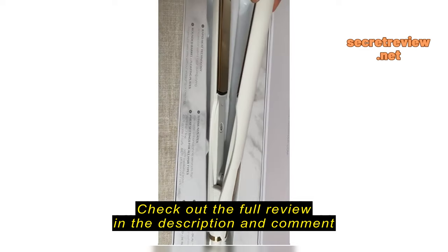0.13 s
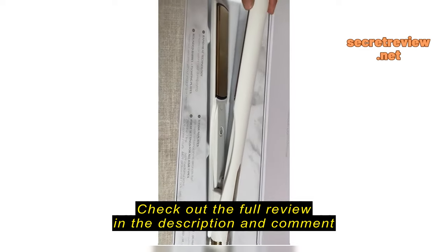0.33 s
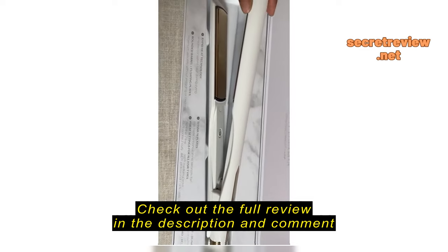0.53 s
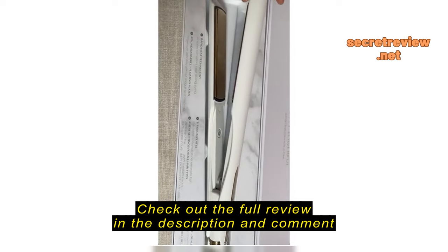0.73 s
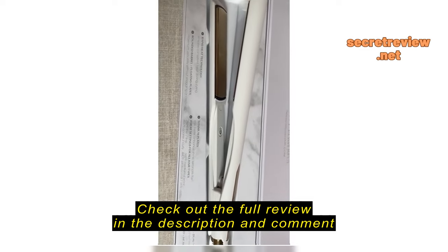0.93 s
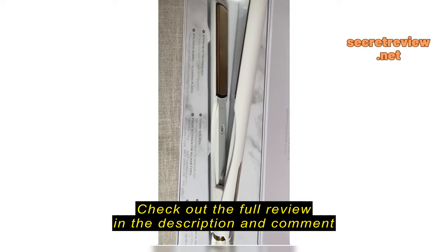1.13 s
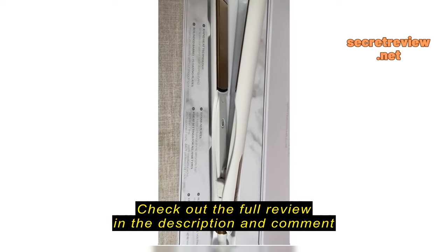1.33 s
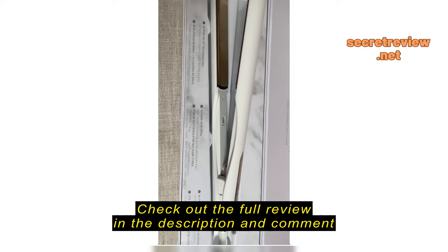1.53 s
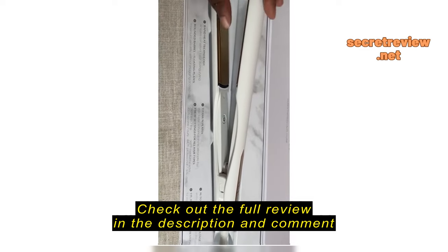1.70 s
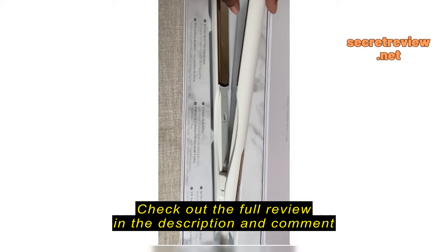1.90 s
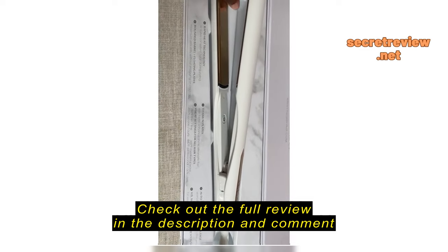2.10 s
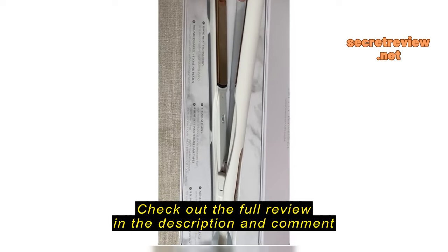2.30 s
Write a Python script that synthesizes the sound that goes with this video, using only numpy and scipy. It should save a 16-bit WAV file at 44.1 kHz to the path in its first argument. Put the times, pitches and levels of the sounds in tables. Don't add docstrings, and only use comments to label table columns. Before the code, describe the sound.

Close phone pickup in a small quiet room: a hair straightener knocks on a hollow cardboard box. A low settling thud and drone open at 0 s; loud clustered knocks, plastic clacks and sharp cracks follow at 0.24-0.32 and 0.39-0.55 s, with finger rubs and low box sliding. Faint ventilation hum remains, then light taps at 1.08 and 1.25 s and a clearer clack at 1.41 s, then quiet.

```python
import sys
import numpy as np
from scipy import signal
from scipy.fft import rfft, irfft
from scipy.io import wavfile
from scipy.ndimage import map_coordinates

SR = 44100
rng = np.random.default_rng(int(sys.argv[2]) if len(sys.argv) > 2 else 0)


def volts_from_decibels(level):
    exponent = np.asarray(level, float) / 20
    return 10 ** exponent


def transcribe(signal):
    frames = np.atleast_2d(signal).T
    limited = np.clip(frames, -1, 1)
    pcm = np.round(limited * 32767).astype(np.int16)
    wavfile.write(sys.argv[1], SR, pcm)


N = 103635
LONG = 2 ** 15
HZ = np.fft.rfftfreq(LONG, 1 / SR)
FULL_HZ = np.fft.rfftfreq(N, 1 / SR)
T_S = np.arange(N) / SR
AIR_TOP_HZ = 12900
MID_TO_SIDES = np.array([[1], [-1]])


def unit(x):
    return x / np.sqrt(np.mean(x ** 2) + 1e-20)


def along(points, hz):
    f, v = np.transpose(points)
    return np.interp(np.log(hz + 1), np.log(f + 1), v)


def noise(gain):
    return unit(irfft(rfft(rng.standard_normal(N)) * gain, N))


def wobble(rate_hz):
    knots = rng.standard_normal(int(N * rate_hz / SR) + 4)
    return map_coordinates(knots, [np.arange(N) * rate_hz / SR])


def octave_band(centre_hz, octaves):
    return np.exp(-(np.log2((FULL_HZ + 1) / centre_hz) / octaves) ** 2)


def stroke(start_s, length_s, level_db):
    return volts_from_decibels(level_db) * np.sin(np.pi * np.clip((T_S - start_s) / length_s, 0, 1)) ** 2


def pan(db):
    return volts_from_decibels([[db / 2], [-db / 2]])


def air():
    # hz, density_db [dB per Hz]
    mid_colour = [(20, -43), (45, -16.5), (75, -2.5), (300, -10.5), (800, -18), (3600, -21.5),
                  (6500, -35.5), (13000, -48)]
    side_colour = [(20, -38), (85, -17), (200, -15.5), (400, -7), (800, -6), (3600, -16.5), (6500, -27),
                   (13000, -46)]
    # centre_hz, width_hz, level_db
    hum_modes = [(73, 12, -58), (100, 8, -57), (140, 12, -61), (219, 7, -55), (290, 7, -58), (385, 14, -64),
                 (440, 14, -65)]
    mid_db, side_db, hum_swing_db, pan_db = -52, -53, 1.5, 1
    below_top = FULL_HZ < AIR_TOP_HZ
    hum = 0
    for centre_hz, width_hz, level_db in hum_modes:
        resonance = 1 / np.abs(1 + 2j * (FULL_HZ - centre_hz) / width_hz) ** 2
        hum = hum + volts_from_decibels(level_db + hum_swing_db * wobble(5.03)) * noise(resonance)
    mid = volts_from_decibels(mid_db + 0.27 * wobble(5.7)) * noise(volts_from_decibels(along(mid_colour, FULL_HZ)) * below_top)
    side = volts_from_decibels(side_db + 0.41 * wobble(5.1)) * noise(volts_from_decibels(along(side_colour, FULL_HZ)) * below_top)
    return (mid + hum + side * MID_TO_SIDES) * pan(pan_db)


def slides():
    # start_s, length_s, level_db, centre_hz
    slide_events = [
        (-0.106, 0.29, -39.5, 137),
        (-.08, 0.23, -40.5, 270),
        (0.201, 0.037, -38.5, 283),
        (0.256, 0.2, -36, 129),
        (1.239, 0.12, -48, 440),
        (1.187, .2, -41, 222),
        (1.247, 0.011, -42, 940),
        (1.246, 0.0078, -46, 1860),
        (1.411, .008, -47.5, 5600),
        (.236, 0.027, -41.5, 1150),
    ]
    return sum(stroke(*row) * noise(octave_band(centre_hz, 0.27)) for *row, centre_hz in slide_events)


def shell_hiss(centre_hz):
    octaves, grain_db = 1.2, 2
    grain = volts_from_decibels(grain_db * wobble(300))
    return grain * noise(octave_band(centre_hz, octaves) * (FULL_HZ < AIR_TOP_HZ))


def rubs():
    # start_s, length_s, level_db, centre_hz
    rub_events = [(-.04, 0.13, -57, 5900), (0.183, 0.15, -50, 5000), (0.237, 0.023, -37.5, 8400),
                  (0.278, .02, -38.5, 2570), (0.233, 0.033, -41, 1100), (0.289, .05, -41, 2900),
                  (0.397, 0.039, -36.5, 5000), (0.465, 0.074, -35, 1720), (0.532, 0.12, -50, 1930),
                  (0.68, 0.071, -60.5, 6000), (1.13, 0.24, -62.5, 5600), (1.219, 0.077, -48, 1530)]
    apart = 1
    shell = 0
    for *row, centre_hz in rub_events:
        wide = shell_hiss(centre_hz) + apart * shell_hiss(centre_hz) * MID_TO_SIDES
        shell = shell + stroke(*row) * wide
    return shell / np.sqrt(2)


def room_tail():
    # hz, t60_s
    decay = [(120, 0.56), (400, 0.19), (1500, 0.18), (5000, 0.25), (12000, 0.23)]
    alike_hz, rise_s, delay_s = 460, .012, .006
    hz, t, z = signal.stft(rng.standard_normal((2, LONG * 3 // 4)), SR, nperseg=256)
    z[1] += (z[0] - z[1]) / (1 + (hz[:, None] / alike_hz) ** 2)
    fade = volts_from_decibels(-60 * t / along(decay, hz)[:, None]) * (1 - np.exp(-t / rise_s))
    tail = signal.istft(z * fade, SR, nperseg=256)[1]
    return rfft(tail / np.linalg.norm(tail[0]), LONG) * np.exp(-2j * np.pi * HZ * delay_s)


def soft_blow(centre_hz):
    soft_hz = 1800
    return 1 / (1 + 1.4j * HZ / soft_hz - (HZ / soft_hz) ** 2) ** 2


def swelling_blow(centre_hz):
    swell_hz = 221
    return 1 / (1 + 1j * (HZ - centre_hz) / swell_hz)


def struck(modes, scatter, blow):
    scatter_db = 2
    h = 0
    for k, (centre_hz, width_hz, level_db) in enumerate(modes):
        gain = (-1) ** k * volts_from_decibels(level_db + scatter_db * scatter[k])
        damping = 1j * HZ * width_hz
        h = h + gain * damping / (centre_hz ** 2 - HZ ** 2 + damping) * blow(centre_hz)
    return h / np.abs(irfft(h)).max()


def box_knock(lid_scatter, box_scatter):
    # centre_hz, width_hz, level_db
    lid_modes = [(350, 122, 5.5), (1100, 780, -11)]
    # centre_hz, width_hz, level_db
    box_modes = [(75.5, 11.4, -8), (137, 16, -2), (221.6, 10, -5.5), (275.5, 13.3, -4.5),
                 (359.5, 150, -0.5), (395.5, 33.6, 4), (442.6, 15, -3.5), (586, 120, -5), (661.3, 13.3, -6),
                 (884, 27, -12.5)]
    level_db, ring_db, spread = -3.5, -7, .1
    bend = np.exp(-2j * np.pi * spread * (2 * np.sqrt(HZ) - HZ / np.sqrt(2000)))
    thud = struck(lid_modes, lid_scatter, soft_blow)
    ring = struck(box_modes, box_scatter, soft_blow)
    return volts_from_decibels(level_db) * bend * (thud + volts_from_decibels(ring_db) * ring)


def arm_clack(scatter):
    # centre_hz, width_hz, level_db
    arm_modes = [(1068, 76, 4), (1177, 273, 2.5), (1437, 136, 2.5), (1510, 180, -2), (1782, 240, -3)]
    level_db, pan_db = 6.5, -5.5
    return volts_from_decibels(level_db) * pan(pan_db) * struck(arm_modes, scatter, swelling_blow)


def plate_clack(scatter):
    # centre_hz, width_hz, level_db
    plate_modes = [(2450, 130, 4.5), (2606, 230, -2.5), (3160, 120, -7), (4130, 300, -13.5),
                   (5930, 780, -30)]
    return volts_from_decibels(-2.5) * struck(plate_modes, scatter, swelling_blow)


def crack():
    # hz, density_db [dB per Hz]
    colour = [(1500, -11.5), (3000, 4.5), (5000, -5.5), (7400, -7), (10000, -15.5), (13000, -24.5),
              (16000, -26)]
    level_db, rise_s, crack_t60_s, scrape_t60_s, scrape_db, apart = 4, .0012, .012, 0.13, -10.5, 0.88
    t = np.arange(LONG) / SR
    fade = volts_from_decibels(-60 * t / crack_t60_s) + volts_from_decibels(scrape_db - 60 * t / scrape_t60_s)
    burst = rng.standard_normal((2, LONG)) * fade * (1 - np.exp(-t / rise_s))
    mid, side = rfft(burst) * volts_from_decibels(along(colour, HZ))
    return volts_from_decibels(level_db) * (mid + apart * side * MID_TO_SIDES)


def contacts():
    # arm_clack_db, plate_clack_db, crack_db
    firm = [(0.002, -25, -25, -28, -13.5), (0.016, -28.5, -16, -38, -42), (0.037, -30.5, -34, -10, -9),
            (0.243, -13.5, -24.5, -29, -26), (0.25, -14, -25, -33, -23.5), (0.26, -15.5, -40, -39, -22),
            (0.295, -10, -13, -8.5, -4.5), (0.299, -6, -14, -17, -46), (0.305, -6, -14.5, -40, -18),
            (0.313, -10.5, -20.5, -14, -40), (0.318, -25.5, -35, -32, -29), (0.394, -25.5, 4.5, -12, -5),
            (0.403, 0, -12.5, -26, -27), (0.415, -11, -44, -17, -14.5), (0.425, -19, -22, -39, -37),
            (0.448, -17.5, -28, -37, -47), (0.492, -14, -31, -7, -26), (0.498, -15.5, -1.5, 0.5, -16.5),
            (0.51, -16, -25, -10, -19), (0.554, -38, 0, -3, -37), (1.084, -31.5, -15, -11, -22),
            (1.249, -31, -17, -21, -28), (1.258, -28, -35, -15, -13), (1.415, -19, -12.5, -8.5, -21.5)]
    # start_s, knock_db
    nudges = [
        (-.02, -7.5),
        (0.333, -20),
        (.352, -30),
        (0.53, -29.5),
        (0.587, -30.5),
        (0.671, -31.5),
        (1.155, -36),
        (1.276, -41),
        (1.29, -35),
        (1.315, -41.5),
    ]
    nudge_clack_db, nudge_crack_db = -17, -40
    lag_s, room_db = .00032, -10
    lead, before = 128, 2048
    delay_s = lead / SR + lag_s / 2 * MID_TO_SIDES
    ports = np.exp(-2j * np.pi * HZ * delay_s)
    soft = [(*row, nudge_clack_db, nudge_clack_db, nudge_crack_db) for row in nudges]
    out = np.zeros((2, N + 2 * LONG))
    for start_s, knock_db, arm_db, plate_db, crack_db in list(firm) + soft:
        scatter = rng.standard_normal((4, 14))
        near = box_knock(scatter[0], scatter[1]) + volts_from_decibels(arm_db) * arm_clack(scatter[2])
        near = near + volts_from_decibels(plate_db) * plate_clack(scatter[3]) + volts_from_decibels(crack_db) * crack()
        heard = irfft(near * (ports + volts_from_decibels(room_db) * room_tail()), LONG)
        at = round(start_s * SR) - lead + before
        out[:, at:at + LONG] += volts_from_decibels(knock_db) * heard
    return out[:, before:before + N]


def scene():
    return air() + slides() + rubs() + contacts()


def roll_off(x):
    return signal.sosfilt(signal.butter(12, 16460, fs=SR, output="sos"), x)


def record(dry):
    # hz, gain_db
    mic_colour = [(6000, 1), (6800, -3), (7300, -7.5), (7900, -0.5), (12600, 1), (13600, -8), (15300, 2.5),
                  (15700, -80)]
    ceiling = .94
    heard = irfft(rfft(dry) * volts_from_decibels(along(mic_colour, FULL_HZ)), N)
    heard = heard / (1 + np.abs(heard / ceiling) ** 8) ** (1 / 8)
    return roll_off(heard)


dry = scene()
out = record(dry)
transcribe(out)
```